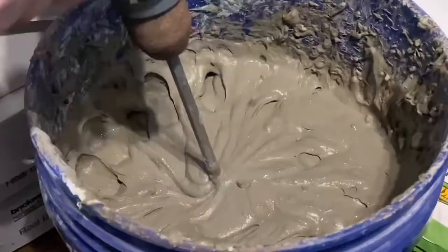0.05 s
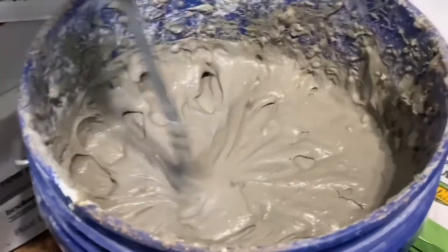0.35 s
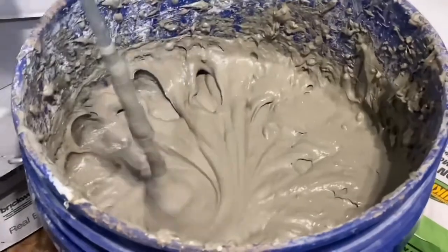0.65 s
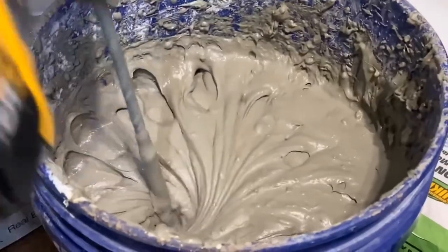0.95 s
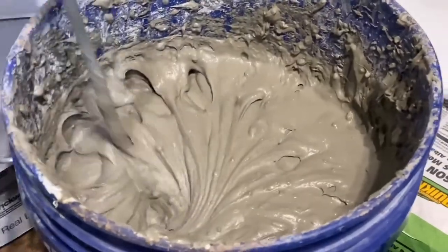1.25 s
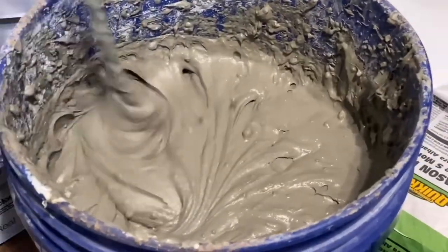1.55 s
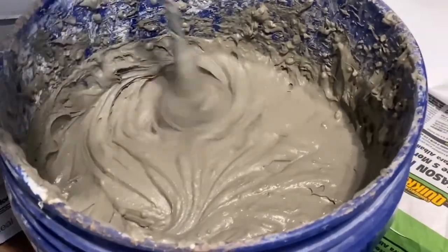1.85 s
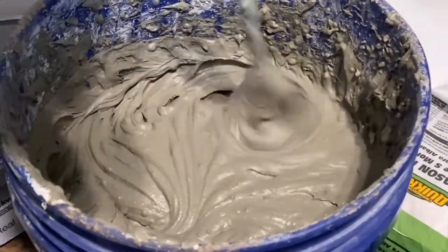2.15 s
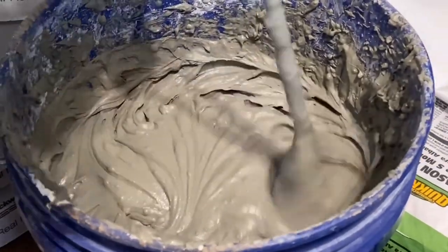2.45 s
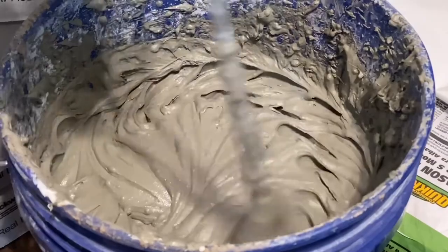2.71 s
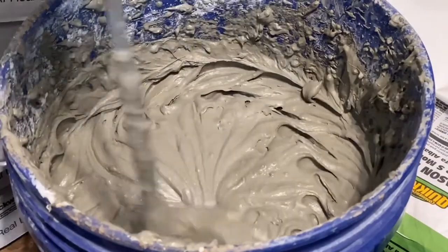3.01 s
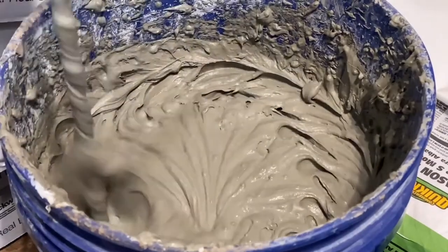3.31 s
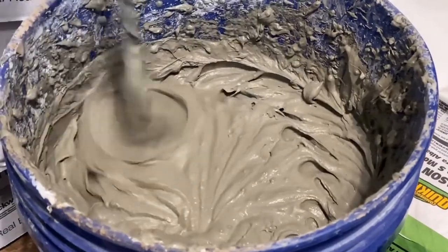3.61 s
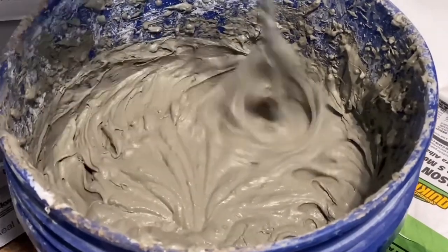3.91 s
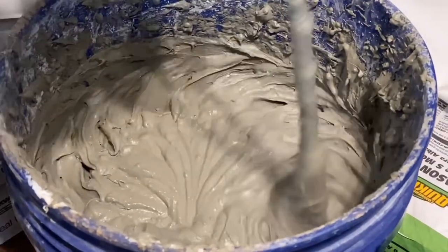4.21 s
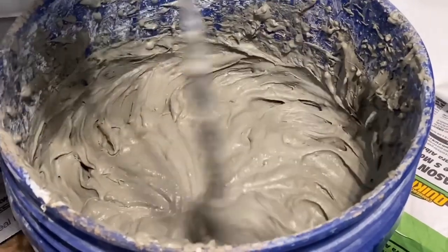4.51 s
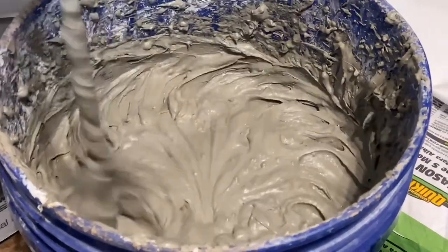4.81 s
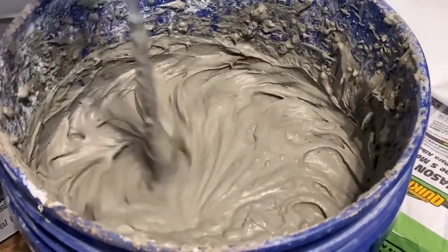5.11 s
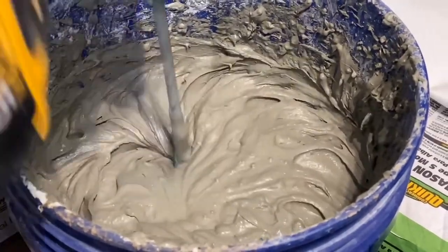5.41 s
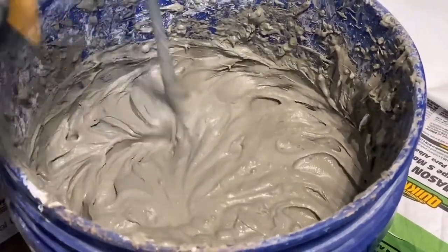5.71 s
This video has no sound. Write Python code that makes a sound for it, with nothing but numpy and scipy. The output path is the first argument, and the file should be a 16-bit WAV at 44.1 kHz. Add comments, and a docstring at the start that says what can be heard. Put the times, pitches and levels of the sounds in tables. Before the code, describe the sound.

Close to the microphone in a quiet room, a power drill starts with a small clack and mixes wet mortar in a plastic bucket. The motor whines over a gear rattle and rushing fan, with brief rasps coming and going. Underneath, the paste squelches lightly, air pockets plop and the paddle bumps the bucket dully. Midway the rush and rattle fade to a softer level, and the drill runs on to the end.

```python
"""A drill mixing mortar

A cordless drill spins a two-bladed paddle through wet mortar in a plastic bucket, close by.
The trigger clicks, and the motor runs up and whines over its rattling gears and rushing fan.
The drill is led round the bucket and turns its vents away half way through, so the rush fades.
Bubbles squelch, air pockets plop, and the paddle nudges the bucket with soft thuds."""
import sys
import numpy as np
from scipy import signal
from scipy.fft import rfft, irfft, next_fast_len
from scipy.io import wavfile
from scipy.ndimage import uniform_filter1d, map_coordinates

SR = 44100
rng = np.random.default_rng(int(sys.argv[2]) if len(sys.argv) > 2 else 0)


def store_wav(level_fs):
    """Save 16-bit WAV to argv[1]."""
    pcm = np.round(np.clip(np.atleast_2d(level_fs), -1, 1) * 32767)
    wavfile.write(sys.argv[1], SR, pcm.T.astype(np.int16))


N = 262615
TIME = np.arange(N) / SR


def from_db(db):
    """Turn decibels into a number to multiply by."""
    return 10 ** (np.asarray(db) / 20)


def unit_level(x):
    """Scale a sound to an average power of 1."""
    return x / np.sqrt(np.mean(x ** 2) + 1e-20)


def curves(rows):
    """Join rows that start with a time by straight lines: one curve for each other column."""
    seconds, *columns = np.transpose(rows)
    return [np.interp(TIME, seconds, column) for column in columns]


def noise(colour):
    """Steady noise shaped by rows of pitch and level, falling away beyond the first and last."""
    size = next_fast_len(N)
    hz = np.maximum(np.fft.rfftfreq(size, 1 / SR), 1)
    points_hz, db = np.transpose(colour)
    roll_off = np.minimum(1, hz / points_hz[0]) ** 2 * np.minimum(1, points_hz[-1] / hz) ** 4
    gain = from_db(np.interp(np.log(hz), np.log(points_hz), db)) * roll_off
    return unit_level(irfft(rfft(rng.standard_normal(size)) * gain, size)[:N])


def narrow_noise(hz, width_hz):
    """Noise gathered around one pitch, which may move."""
    low_pass = signal.butter(2, width_hz / 2, fs=SR, output="sos")
    real, imaginary = signal.sosfilt(low_pass, rng.standard_normal((2, N)))
    angle = 2 * np.pi * np.cumsum(hz * np.ones(N)) / SR
    return unit_level(real * np.cos(angle) + imaginary * np.sin(angle))


def drift(rate_hz):
    """A smooth random wobble, about 1 in size; a higher rate wobbles faster."""
    step = 40  # samples between random points
    r = np.exp(-2 * np.pi * step * rate_hz / SR)
    slow = signal.lfilter([1], [1, -2 * r, r * r], rng.standard_normal(N // step + 2002))[2000:]
    return np.interp(np.arange(N) / step, np.arange(len(slow)), unit_level(slow))


def band(x, low_hz, high_hz):
    """Keep what lies between two pitches."""
    return signal.sosfilt(signal.butter(2, [low_hz, high_hz], "band", fs=SR, output="sos"), x + 1e-18)


def tone(cycles):
    """A pure tone that follows a running count of cycles."""
    return np.sqrt(2) * np.sin(2 * np.pi * (cycles + rng.random()))


def strikes(rows):
    """One click for each row of seconds and dB."""
    clicks = np.zeros(N)
    for start, db in rows:
        clicks[round(start * SR)] = from_db(db)
    return clicks


def ring(clicks, hz, ring_s):
    """Each click starts a note that fades by 60 dB in ring_s seconds."""
    r, angle = from_db(-60 / (ring_s * SR)), 2 * np.pi * hz / SR
    return signal.lfilter([0, np.sin(angle)], [1, -2 * r * np.cos(angle), r * r], clicks + 1e-18)


def scuff(clicks, decay_s):
    """A puff of noise that dies away after each click."""
    fade = signal.lfilter([1], [1, -np.exp(-1 / (decay_s * SR))], clicks + 1e-18)
    return fade * rng.standard_normal(N)


def follow_air(air_db, base_db, slope, facing_db=-25):
    """A level that is base_db when the air is at facing_db, and moves slope dB for each dB of air."""
    return base_db + slope * (air_db - facing_db)


# The room's background noise. Each row: pitch in Hz, relative level in dB.
ROOM_COLOUR = [(20, 2), (100, -12), (500, 3), (1200, 0), (3500, -5), (8000, -18), (16000, -26)]
def room():
    """A faint, steady hush."""
    return from_db(-60) * noise(ROOM_COLOUR)


# The run-up of the rotor, the motor's spinning part. Each row: time in seconds, turns per second.
ROTOR_SPEED = [(0, 0), (.103, 0), (.18, 150), (.235, 284), (.25, 335), (.266, 386.25), (6, 386.25)]
FULL_SPEED, GEAR_RATIO = ROTOR_SPEED[-1][1], 24  # the paddle turns once in 24 rotor turns
SPIN = curves(ROTOR_SPEED)[0] / FULL_SPEED  # share of full speed, 0 to 1
def rotor_turns(drag=.002, wander=.0007):
    """Count the turns: the motor holds its speed, but the load drags once per paddle turn."""
    speed = SPIN * FULL_SPEED
    paddle_angle = 2 * np.pi * np.cumsum(speed) / SR / GEAR_RATIO
    return np.cumsum(speed * (1 + drag * np.sin(paddle_angle) + wander * drift(10.1))) / SR


# The noise of the gears. Each row: pitch in Hz, relative level in dB.
GEAR_COLOUR = [(120, -38), (260, -25), (350, -6.5), (470, -1), (660, -4), (930, 3.5), (1060, -1.5),
               (1250, 5), (1600, 0.5), (2000, 1.5), (2550, 3), (3000, 0.5), (3600, -1.5), (5000, -40)]
def gear_rattle(gear_db):
    """The gears make a noise whose level shakes quickly."""
    return from_db(gear_db + .15 + drift(110)) * noise(GEAR_COLOUR)


# The fan's rush, the vents' jet and a high hiss. Each row: pitch in Hz, relative level in dB.
FAN_COLOUR = [(2000, -15), (3200, -9.5), (3700, -0.5), (4250, 2.5), (4700, 2.5), (5400, 0.5), (5950, -0.5),
              (6400, -3), (6850, -6), (7400, -16), (8500, -16)]
JET_COLOUR = [(6000, -7), (6900, 3.5), (7300, 1), (7900, -1.5), (8600, 0.5), (9200, -6.5), (10500, -7)]
HISS_COLOUR = [(7800, -17), (9200, 7), (9800, 4), (10900, -1), (11500, 1), (12300, 8), (13200, -6),
               (14300, 5.5), (15600, 0), (16500, -14)]
# The air's hollow note, sinking as the vents turn.
# Each row: time in seconds, pitch in Hz, level in dB against the fan's rush.
HOLLOW_NOTE = [(.3, 7370, -5.5), (1.5, 7250, -13.5), (1.8, 6890, -1.5), (2.3, 6560, -4), (3.05, 6790, -5.5),
               (3.4, 6550, -33), (4.2, 6540, -9), (5.95, 6510, -8)]
def fan_air(fan_db, jet_db, gust_db=.44):
    """The fan blows air out through the vents in slight gusts."""
    hollow_hz, hollow_db = curves(HOLLOW_NOTE)
    fan_gain = from_db(fan_db + .2 + .73 * drift(7))
    rush = noise(FAN_COLOUR)
    hollow = from_db(hollow_db) * narrow_noise(hollow_hz, width_hz=560)
    jet = from_db(jet_db + 2) * noise(JET_COLOUR)
    hiss = from_db(follow_air(fan_db, base_db=-30.5, slope=1.04)) * noise(HISS_COLOUR)
    return (fan_gain * (rush + hollow) + jet + hiss) * from_db(gust_db * drift(24))


# The echo off the bucket wall. Each row: time in seconds, delay in milliseconds, strength.
WALL_ECHO = [(1.3, .31, .04), (1.7, 0.91, .13), (2.8, 0.54, 0.049), (3.05, 0.67, 0.23), (3.5, .68, 0.17),
             (5.95, 0.87, 0.19)]
# Echoes off the mortar, rim and hands. Each row: average delay in milliseconds, strength.
NEAR_ECHOES = [(1.3, .15), (2.1, -.15), (3.4, .14), (5.2, .12)]
def add_echoes(x, sway_ms=.17, wall_sway_ms=.028):
    """Surfaces around the moving drill throw its noise back a moment later, making it swirl."""
    def delayed(sound, ms):
        return map_coordinates(sound, [np.arange(N) - ms * SR / 1000], order=2)
    wall_ms, wall_strength = curves(WALL_ECHO)
    treble = x - uniform_filter1d(x, size=7)  # the curved wall focuses only high sounds
    near = sum(strength * delayed(x, ms + sway_ms * drift(1.09)) for ms, strength in NEAR_ECHOES)
    wall = wall_strength * delayed(treble, wall_ms + wall_sway_ms * drift(1.4))
    return x + wall + near


# The whine, coming and going as the drill moves. Each row: time in seconds, relative level in dB.
WHINE_LEVEL = [(0.27, -28.5), (0.41, -17.5), (0.51, -33.5), (0.82, -32), (0.92, -23.5), (1.2, -31.5),
               (1.34, -23), (1.38, -31.5), (1.6, -25.5), (1.66, -32), (2.41, -37), (2.5, -27), (2.61, -45),
               (2.72, -25.5), (3.24, -20.5), (3.45, -40.5), (3.53, -34.5), (3.62, -47), (3.97, -32.5),
               (4.02, -58), (4.27, -38.5), (4.43, -43.5), (4.48, -33.5), (4.89, -32), (4.97, -39.5),
               (5.35, -35), (5.43, -49), (5.68, -34), (5.73, -43), (5.95, -34)]
def motor_whine(turns, gear_db, fan_db):
    """The motor whines at eight cycles a turn; the paddle scatters some, which makes it waver."""
    whine_db, = curves(WHINE_LEVEL)
    scattered = from_db(gear_db - 9.5) * narrow_noise(8 * FULL_SPEED, width_hz=26)
    direct = from_db(whine_db + 2.54 + .97 * drift(16)) * tone(8 * turns)
    overtone_db = follow_air(fan_db, base_db=-40, slope=1.9)
    overtone = from_db(overtone_db + 4 * drift(25)) * tone(16 * turns)
    return direct + scattered + overtone


# The hum, coming and going as the drill moves. Each row: time in seconds, relative level in dB.
HUM_LEVEL = [(0.27, -60), (0.57, -40), (0.95, -52), (2.79, -44.5), (3.18, -56), (3.48, -42), (3.76, -57),
             (4.27, -49.5), (4.67, -62), (5.03, -47.5), (5.17, -61.5), (5.95, -55)]
def rotor_hum(turns):
    """The rotor hums at one cycle a turn."""
    hum_db, = curves(HUM_LEVEL)
    return from_db(hum_db - 1.5 + 3.6 * drift(25)) * tone(turns)


# The rotor's overtones. Each row: cycles per turn, relative level in dB.
ROTOR_OVERTONES = [(2, -17), (3, -18), (4, -12), (6, -21), (7, -11), (9, -15), (12, -11)]
# The notes of the gears. Each row: pitch at full speed in Hz, relative level in dB.
GEAR_NOTES = [(585, -17.5), (928.6, -12), (1781, -9), (1914, -12), (3771, -38)]
def drive_notes(turns, gear_db, flutter_db=4, slip_cycles=.11):
    """The rotor's overtones keep exact step with it; the gears' notes follow more loosely."""
    rotor = sum(from_db(db + flutter_db * drift(5.2)) * tone(round(per_turn) * turns)
                for per_turn, db in ROTOR_OVERTONES)
    gears = sum(from_db(db + flutter_db * drift(17))
                * tone(hz / FULL_SPEED * turns + slip_cycles * drift(3.3)) for hz, db in GEAR_NOTES)
    return from_db(gear_db - 6) * (rotor + gears)


def electronic_whine(jet_db, hz=8877, wobble_hz=20):
    """The drive electronics give a thin, unsteady high whine that swells and fades along with the jet from the
    vents."""
    gain = from_db(follow_air(jet_db, base_db=-33.5, slope=.65) + 3.5 * drift(25))
    return gain * tone(np.cumsum(hz + wobble_hz * drift(32)) / SR)


# The drill's noise, falling as it turns away.
# Each row: time in seconds, relative levels of the gears and of the fan in dB.
GEAR_AND_FAN_LEVELS = [(0.27, -27.5, -22), (0.51, -27, -23), (2.1, -26.5, -24), (2.67, -27, -24),
                       (2.94, -28, -26.5), (3.01, -33, -31), (3.59, -36, -31), (4.56, -38.5, -36),
                       (5.43, -39.5, -33.5), (5.54, -38.5, -32), (5.63, -39.5, -34.5), (5.95, -38, -32.5)]
# The narrow jet, which points our way only at times. Each row: time in seconds, relative level in dB.
JET_LEVEL = [(0.27, -29), (0.36, -27.5), (1.25, -25.5), (1.34, -27.5), (2.88, -32), (3.15, -49),
             (3.54, -38.5), (4.83, -45), (5.14, -39), (5.19, -35.5), (5.3, -37), (5.95, -38.5)]
def drill(turns, chop_depth=.04):
    """Gears, air and motor all grow louder with speed; the rotor lightly chops the noise each turn."""
    gear_db, fan_db = curves(GEAR_AND_FAN_LEVELS)
    jet_db, = curves(JET_LEVEL)
    chop = 1 + chop_depth * np.sin(2 * np.pi * turns)
    rush = add_echoes((gear_rattle(gear_db) + fan_air(fan_db, jet_db)) * chop)
    motor = motor_whine(turns, gear_db, fan_db) + rotor_hum(turns)
    notes = drive_notes(turns, gear_db)
    whistle = electronic_whine(jet_db)
    # On the way up, the whine passes a pitch at which the drill's body rings.
    chirp = from_db(-20.5) * np.exp(-((TIME - .242) / .009) ** 4) * tone(8 * turns)
    return SPIN ** 1.01 * (rush + notes + chirp + SPIN ** 2 * (motor + whistle))


# The trigger and chuck (the paddle's clamp) knocking. Each row: start in seconds, relative level in dB.
CLACKS = [(0.1248, -16), (0.1565, -21), (0.1812, -4.5), (0.1823, -7), (0.1846, -7)]
# The notes of the drill's body. Each row: pitch in Hz, relative level in dB, ring time in seconds.
BODY_NOTES = [(900, -27, 0.011), (2130, -15, .008), (3200, -6, 0.0071), (4600, -9, 0.0087),
              (5200, -8.5, 0.0075), (6730, -4, 0.012), (8100, -15, .005), (12000, -14, .003)]
def clacks():
    """Loose plastic and steel parts knock together as the drive engages, ringing the body."""
    clicks = strikes(CLACKS)
    body = sum((-1) ** k * from_db(db) * ring(clicks, hz, ring_s)
               for k, (hz, db, ring_s) in enumerate(BODY_NOTES))
    grit = band(scuff(clicks, decay_s=.00091), 1500, 15000)
    return body + from_db(-12) * grit


# The drill's rasps and squeals. Each row: start and end in seconds, pitch and width in Hz, level in dB.
RASPS = [(0.131, 0.198, 980, 258, -35.5), (0.202, 0.227, 1004, 193, -31.5),
         (0.433, 0.875, 6220, 106, -25.5), (0.466, 0.66, 4700, 307, -26), (1.192, 1.532, 926, 169.7, -38.5),
         (1.384, 1.565, 5280, 602, -26.5), (1.4, 1.468, 1890, 256.5, -29), (1.3, 2.4, 6255, 104.3, -34.5),
         (2.617, 2.793, 4250, 349, -29.5), (2.667, 3.437, 1300, 200, -41.5),
         (3.295, 3.844, 4470, 399.5, -36), (3.62, 4.452, 762, 88.6, -50.5), (3.08, 3.16, 4330, 301, -37),
         (4.3, 5.013, 1272, 150, -44.5), (5.144, 5.295, 7360, 351, -35), (5.37, 5.528, 6350, 105, -31),
         (5.457, 5.617, 2070, 299.5, -38)]
def rasps(fade_share=.16, bend_share=.3):
    """Ringing rasps swell out of the running drill, hold and fade, bending a little in pitch."""
    out, bend = np.zeros(N), bend_share * drift(7)
    for start, end, hz, width_hz, db in RASPS:
        fade_s = fade_share * (end - start)
        swell = np.clip(np.minimum(TIME - start, end - TIME) / fade_s, 0, 1)
        out += from_db(db) * swell * narrow_noise(hz + width_hz * bend, width_hz)
    return out


# The throb, strongest on the second lap of the bucket. Each row: time in seconds, relative level in dB.
THROB_LEVEL = [(.25, -66), (3.25, -67), (3.65, -57.5), (5.0, -67), (5.15, -78), (5.95, -70)]
def blade_throb(turns, swing_db=4):
    """The two blades push a low throb out of the bucket, two beats per paddle turn."""
    throb_db, = curves(THROB_LEVEL)
    return SPIN ** 2 * from_db(throb_db + swing_db * drift(5.3)) * tone(2 * turns / GEAR_RATIO)


def squelch(bubbles_per_s=260, ring_cycles=7.7):
    """Small bubbles tear open at random in the mortar, each ringing briefly at one of 14 pitches."""
    sizes = from_db(4 * np.minimum(rng.exponential(1, N), 4)) * rng.choice([-1, 1], N)
    clicks = sizes * (rng.random(N) < bubbles_per_s / SR)
    pitches_hz = np.geomspace(380, 3800, 14)
    chosen = rng.integers(0, len(pitches_hz), N)
    bubbles = sum(ring(clicks * (chosen == k), hz, ring_cycles / hz) for k, hz in enumerate(pitches_hz))
    return unit_level(bubbles)


# How hard the paddle churns. Each row: time in seconds, relative level in dB.
CHURN_LEVEL = [(0.25, -55), (0.3, -67), (0.88, -63), (1.28, -76), (1.36, -54), (2.77, -67.5), (2.95, -54.5),
               (3.6, -66), (5.43, -71), (5.52, -52), (5.55, -76), (5.85, -59.5), (5.95, -59)]
# The noise of the kneaded paste. Each row: pitch in Hz, relative level in dB.
CHURN_COLOUR = [(25, -4), (60, -7), (130, -9), (220, -0.5), (330, 1), (480, 14), (800, -10), (2000, -27)]
def churn(lump_db=1.5):
    """The blades knead the mortar in lumps; the harder they churn, the louder it squelches."""
    churn_db, = curves(CHURN_LEVEL)
    kneading = from_db(churn_db + 8 + lump_db * drift(35)) * noise(CHURN_COLOUR)
    return SPIN ** 2 * (kneading + from_db(churn_db + 5.5) * squelch())


# The paddle's runs along the wall. Each row: start and end in seconds, relative starting level in dB.
WALL_RUNS = [(1.378, 1.4, -41), (2.92, 3.11, -44), (3.229, 3.31, -41), (4.769, 4.8, -49),
             (5.5, 5.89, -38.5)]
def bucket_thuds(fade_db_per_s=28, spread_db=2):
    """The paddle nudges the bucket once a turn, fading over each run: a low bump and a dull scuff."""
    turn_s = GEAR_RATIO / FULL_SPEED
    nudges = strikes([(s, db - fade_db_per_s * (s - start) + spread_db * rng.standard_normal())
                      for start, end, db in WALL_RUNS for s in np.arange(start, end, turn_s)])
    rub = from_db(5) * scuff(nudges, decay_s=.02)
    bump = from_db(2) * ring(nudges, hz=105, ring_s=.032)
    return band(rub + bump, 54, 310)


# Air pockets in the mortar. Each row: start in seconds, relative level in dB, starting pitch in Hz.
AIR_POCKETS = [(1.492, -14, 880), (1.509, -20, 850), (1.769, -21, 447), (1.801, -18, 444),
               (1.839, -24.5, 420), (1.902, -31, 395), (1.983, -18, 463), (2.042, -17, 417),
               (2.118, -20, 404), (2.261, -26, 472)]
def plops(swell_s=.0034, splash=.36):
    """A pocket closing behind a blade rings briefly, rising in pitch as it shuts, with a wet splash."""
    out, wet = np.zeros(N), unit_level(band(rng.standard_normal(N), 200, 1600))
    for start, db, hz in AIR_POCKETS:
        age = np.maximum(TIME - start, 0)
        swell = (age / swell_s * np.exp(1 - age / swell_s)) ** 2
        rising_note = np.sin(2 * np.pi * hz * age * (1 + 4 * age))
        out += from_db(db - 5.5) * swell * (rising_note + splash * wet)
    return band(out, 210, 2500)


def scene():
    """Drill, bucket of mortar and a quiet room, the same on the left and right."""
    turns = rotor_turns()
    tool = drill(turns) + clacks() + rasps()
    bucket = blade_throb(turns) + churn() + bucket_thuds() + plops()
    mono = tool + bucket + room()
    return np.stack([mono, mono])


def record(dry, cutoff_hz=15800):
    """Cut the very highest treble off steeply."""
    return signal.sosfilt(signal.ellip(12, .1, 90, cutoff_hz, fs=SR, output="sos"), dry)


dry = scene()
out = record(dry)
store_wav(out)
```